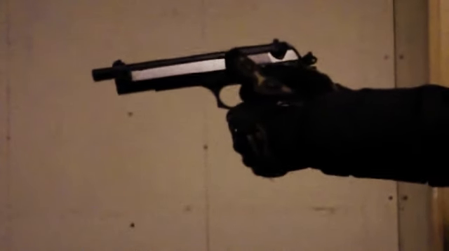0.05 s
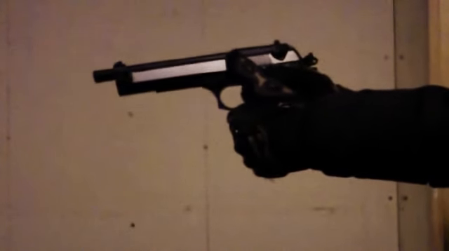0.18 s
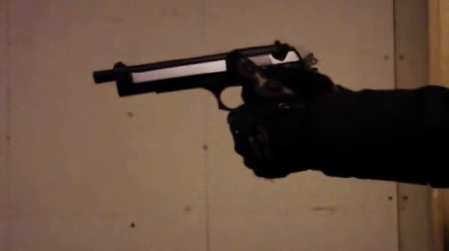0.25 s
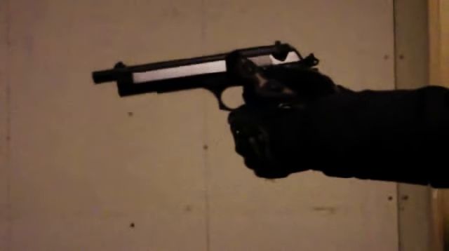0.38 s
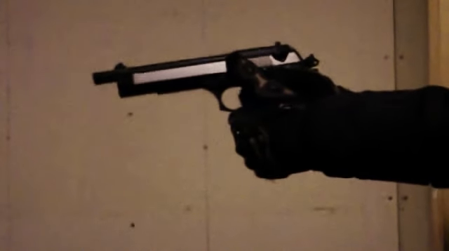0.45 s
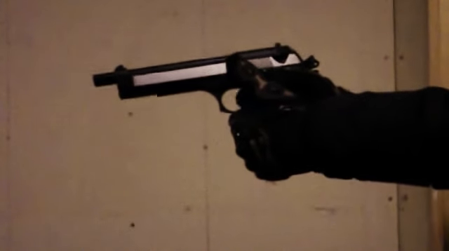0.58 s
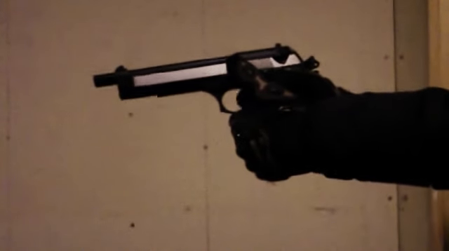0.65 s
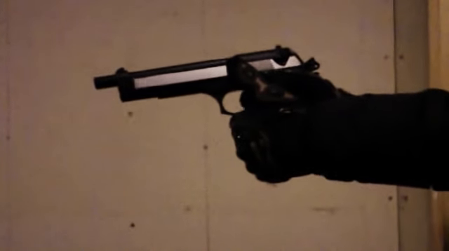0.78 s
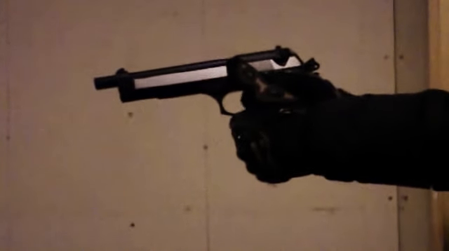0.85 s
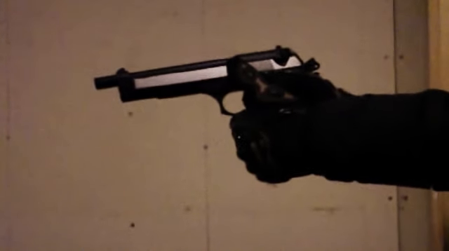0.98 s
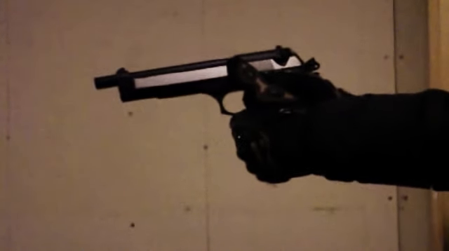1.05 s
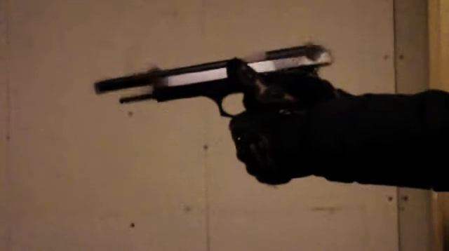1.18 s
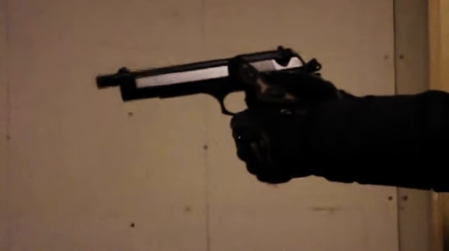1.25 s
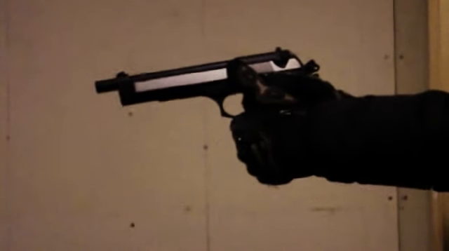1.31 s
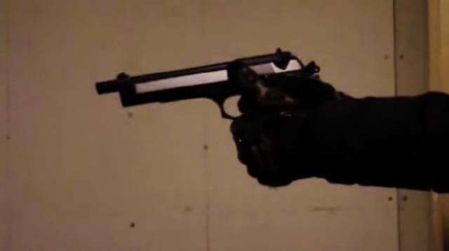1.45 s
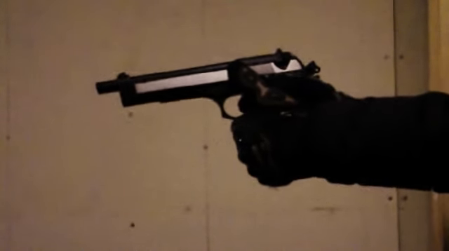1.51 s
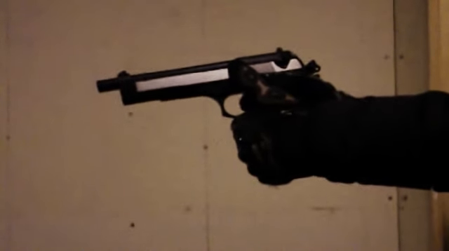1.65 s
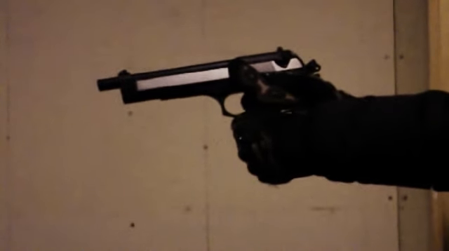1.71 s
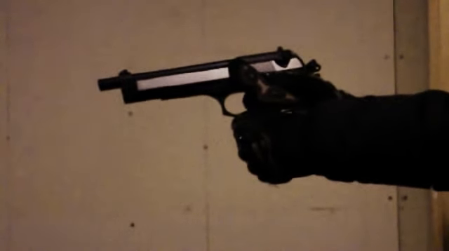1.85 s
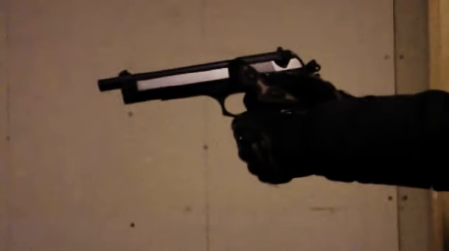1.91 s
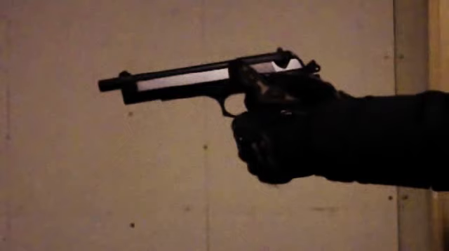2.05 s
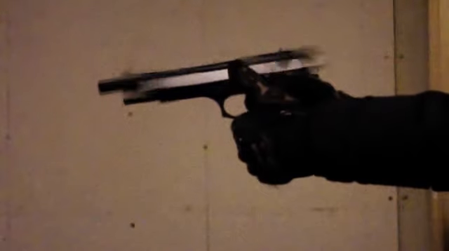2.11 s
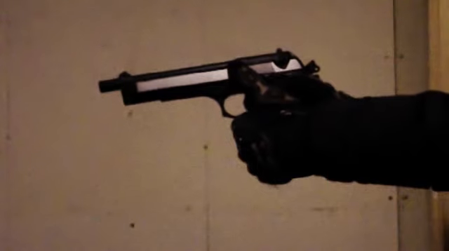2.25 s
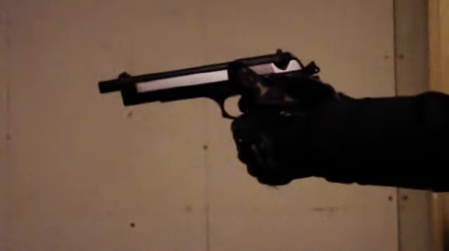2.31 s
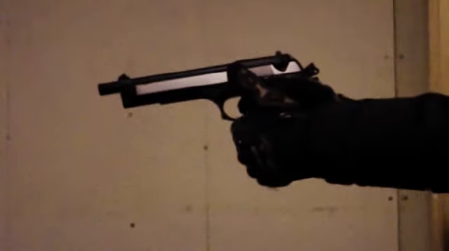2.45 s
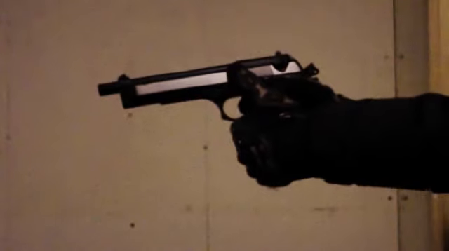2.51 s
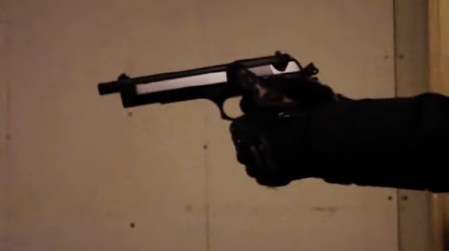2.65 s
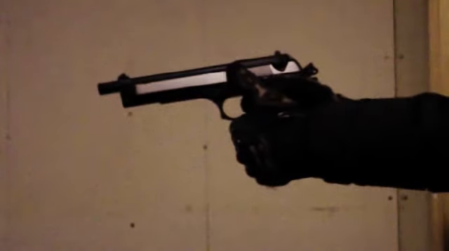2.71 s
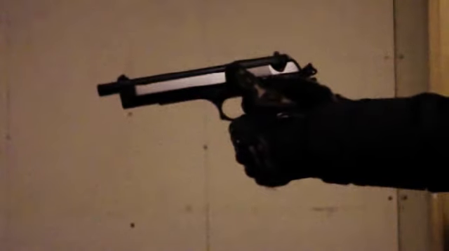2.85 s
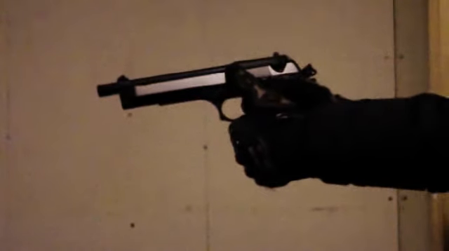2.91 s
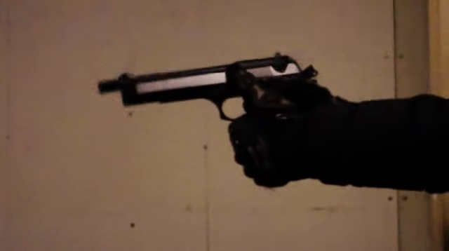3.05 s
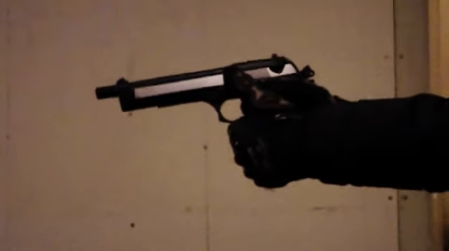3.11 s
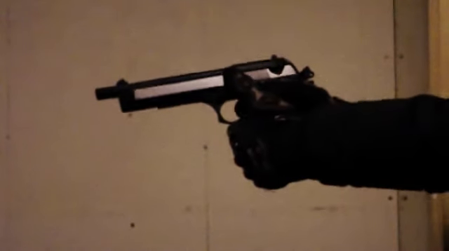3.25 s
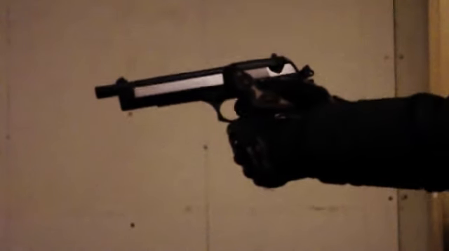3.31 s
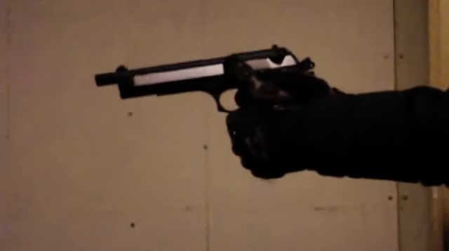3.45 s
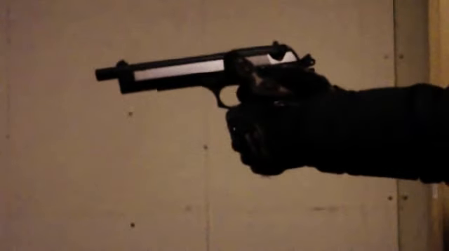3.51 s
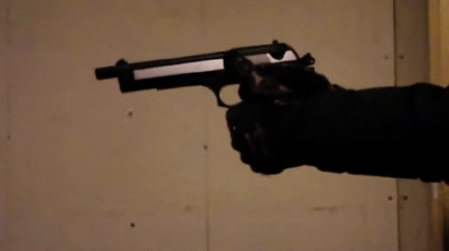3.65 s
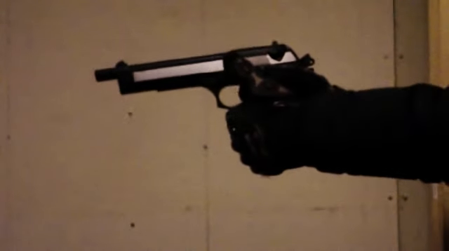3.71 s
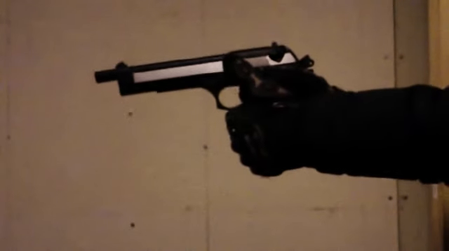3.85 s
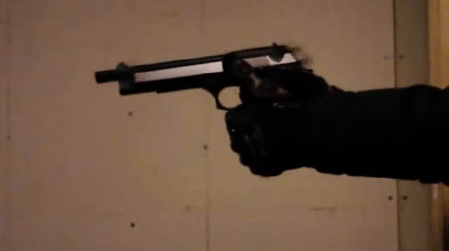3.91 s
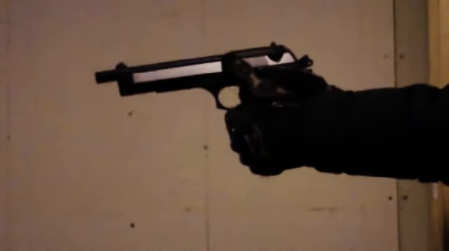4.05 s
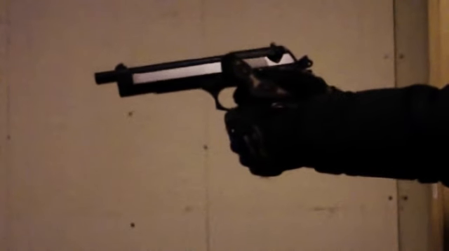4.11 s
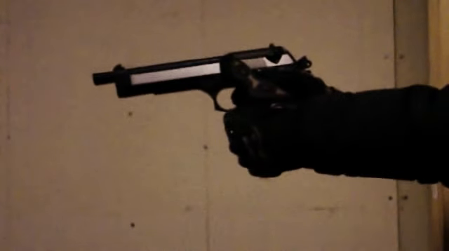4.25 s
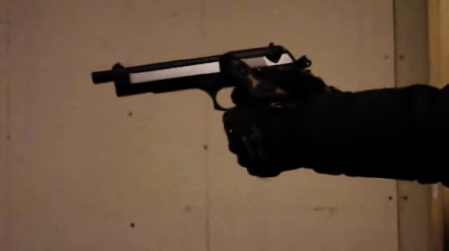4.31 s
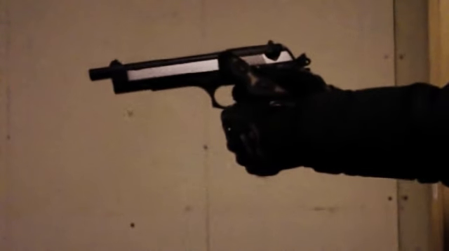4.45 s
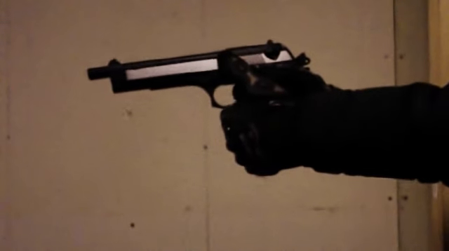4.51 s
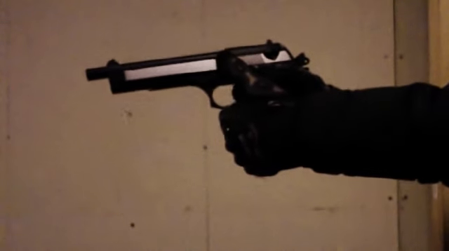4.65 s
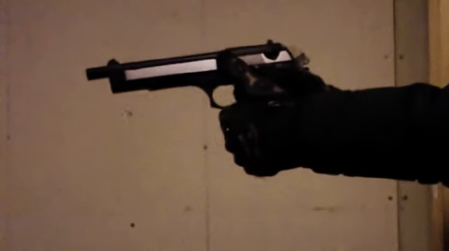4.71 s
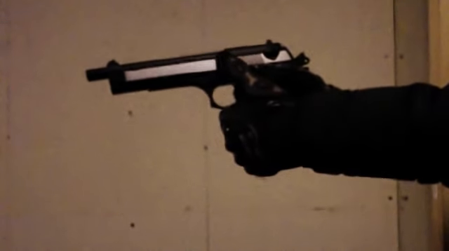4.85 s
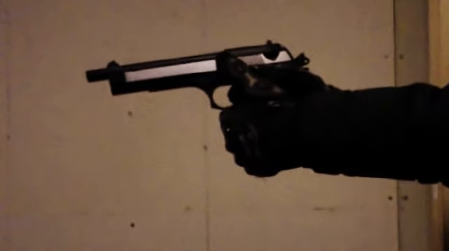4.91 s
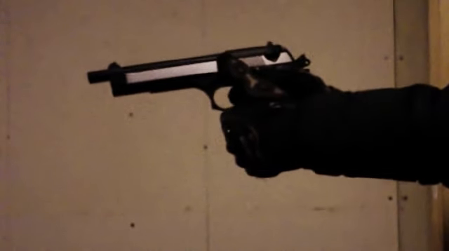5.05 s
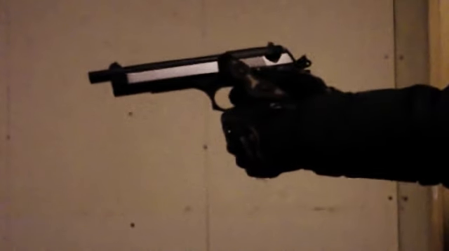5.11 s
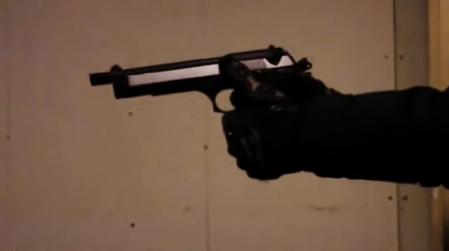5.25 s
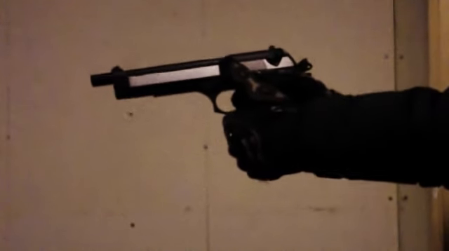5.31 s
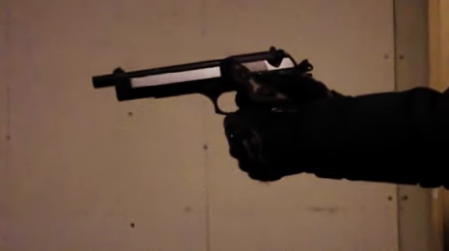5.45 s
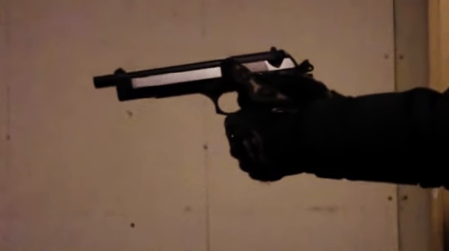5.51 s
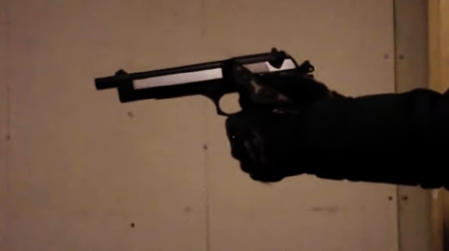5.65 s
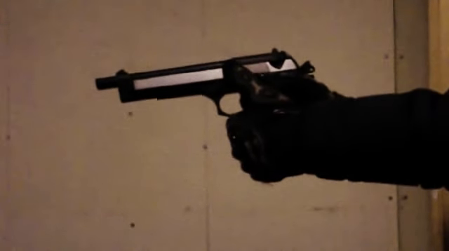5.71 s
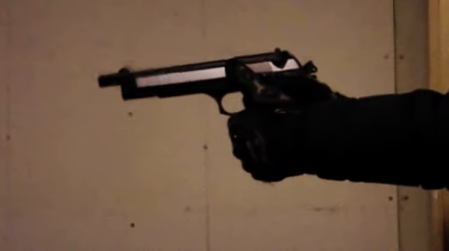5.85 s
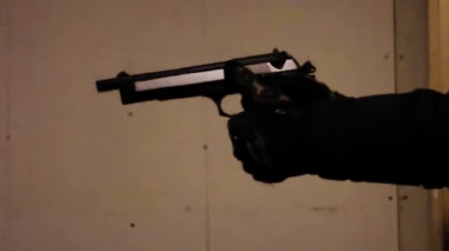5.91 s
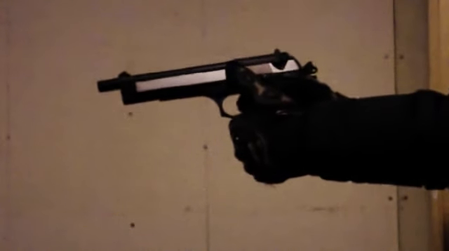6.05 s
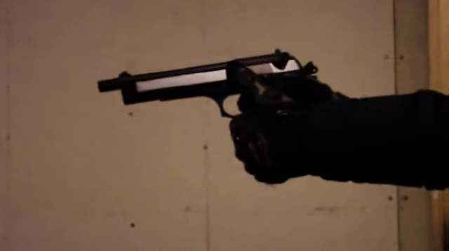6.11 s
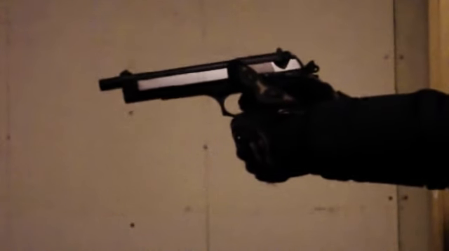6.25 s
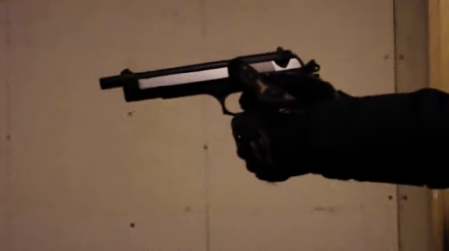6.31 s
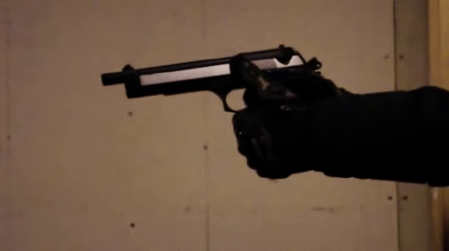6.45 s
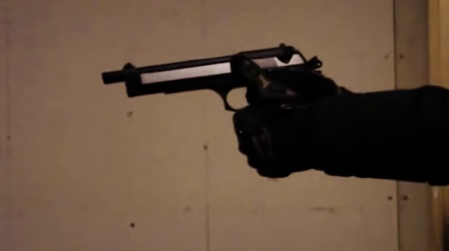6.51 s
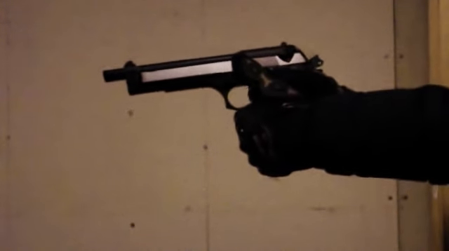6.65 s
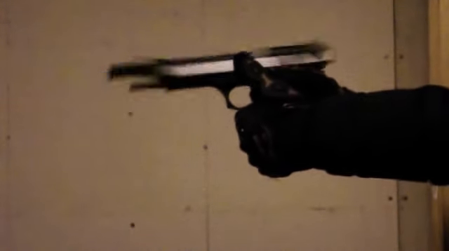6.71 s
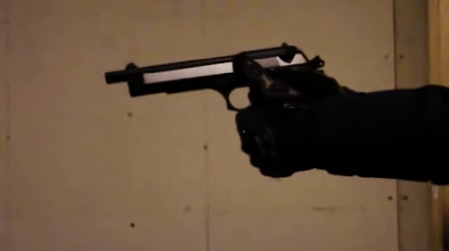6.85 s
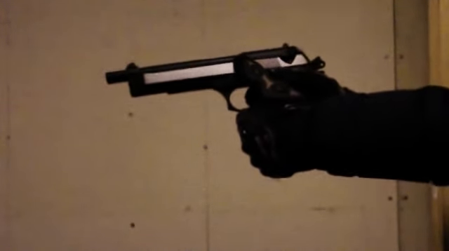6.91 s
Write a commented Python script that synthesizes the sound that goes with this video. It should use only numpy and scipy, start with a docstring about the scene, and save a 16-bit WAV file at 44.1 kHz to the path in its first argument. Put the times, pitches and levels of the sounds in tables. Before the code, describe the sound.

In a small room with hard walls, a close airsoft pistol cracks eight times at a steady pace. Every shot joins a hammer snap, a puff of gas and a slide clacking back and shut, then dies away quickly. A few faint ticks and soft handling sounds come in the gaps. Underneath are quiet room tone, a faint regular swish and a deep rumble that swells slightly with each shot.

```python
"""Eight sharp single shots from a gas blowback airsoft pistol, close to the microphone in a small hard room.
In each, the hammer cracks on the valve, the gas pops and hisses a moment later, and the slide hits
its rear stop, rebounds and slams shut. Pellet taps, light clicks and soft handling fall between shots.
The near walls answer with quick echoes and a short tail. Behind it all lie quiet room air,
a deep rumble that swells with each shot, and a faint repeating swish."""
import sys
import numpy as np
from scipy import signal
from scipy.fft import rfft, irfft, next_fast_len
from scipy.io import wavfile

SR = 44100
rng = np.random.default_rng(int(sys.argv[2]) if len(sys.argv) > 2 else 0)


def pcm_store(signal):
    """Save signal as 16-bit PCM."""
    levels = np.round(np.clip(np.atleast_2d(signal), -1, 1) * 32767)
    wavfile.write(sys.argv[1], SR, levels.astype(np.int16).T)


N = 307818
SIZE = 32768  # samples that hold one contact and its room tail
T = np.arange(SIZE) / SR
HZ = np.fft.rfftfreq(SIZE, 1 / SR)


def amp(db):
    """Decibels to gain."""
    return 10 ** (np.asarray(db) / 20)


def fade(t60):
    """A decay that loses 60 dB in t60 seconds."""
    return np.exp(-np.log(1000) * T / t60)


def along(points, hz):
    """Read a curve of (frequency, value) points on a log frequency axis."""
    freqs, values = np.transpose(points)
    return np.interp(np.log(hz + 1), np.log(freqs), values)


def add(track, start_s, sound):
    """Mix a sound into the track from start_s on."""
    start = max(round(start_s * SR), 0)
    part = sound[:max(N - start, 0)]
    track[start:start + len(part)] += part


def noise(spectrum):
    """Steady coloured noise of rms 1."""
    colour = amp(along(spectrum, np.fft.rfftfreq(N, 1 / SR)))
    steady = irfft(rfft(rng.standard_normal(N)) * colour, N)
    return steady / steady.std()


def burst(spectrum, t60, rise_s, knock_db=0):
    """A dying puff of coloured noise; knock_db lifts or cuts the bass below about 900 Hz."""
    colour = amp(along(spectrum, HZ))
    colour *= amp(knock_db / (1 + (HZ / 900) ** 4)) / np.sqrt(np.mean(colour ** 2))
    cepstrum = irfft(np.log(colour))  # folded to minimum phase: nothing rings before the blow
    cepstrum[1:SIZE // 2] *= 2
    cepstrum[SIZE // 2 + 1:] = 0
    puff = rng.standard_normal(SIZE) * fade(t60) * (1 - np.exp(-T / rise_s))
    puff *= np.sqrt(SR / 1000) / np.linalg.norm(puff)
    return irfft(rfft(puff) * np.exp(rfft(cepstrum)))


def ring(modes, rise_s):
    """Damped modes, struck at slightly new strengths each time."""
    tones = sum(amp(db + rng.normal()) * np.sin(2 * np.pi * hz * T) * fade(t60) for hz, db, t60 in modes)
    return tones * (1 - np.exp(-T / rise_s))


# The air of the quiet room: frequency_hz, level_db
AIR_SPECTRUM = [(30, 0), (60, -8), (130, -16), (400, -22), (600, -21), (1100, -27), (2000, -31),
                (3000, -36), (4200, -46), (6000, -42), (10500, -46), (12800, -57)]

def room_air():
    """Steady room tone, strongest in the bass."""
    return amp(-54.5) * noise(AIR_SPECTRUM)


def rumble():
    """Each shot stirs up a deep rumble, which holds a moment and sinks back to rest."""
    rest_db, swell_db = -56, -44
    attack_s, hold_s, fall_db_per_s = .012, .18, 22
    power = np.full(N, amp(rest_db) ** 2)
    for start_s, *_ in TRIGGER_PULLS:
        age = np.maximum(np.arange(N) / SR - start_s, 0)
        fall_db = fall_db_per_s * np.maximum(age - hold_s, 0)
        power += (np.minimum(age / attack_s, 1) * amp(swell_db - fall_db)) ** 2
    return np.sqrt(power) * noise([(8, -5), (22, -.5), (36, -4), (60, -16.5), (120, -43), (400, -68.5)])


# A swish in the background of the room: frequency_hz, level_db
SWISH_SPECTRUM = [(200, -13), (550, -10.5), (760, 2.5), (1000, -17.5), (1300, -11.5), (1520, -3.5),
                  (1700, -10), (1900, -7), (3100, -13.5), (4300, -17), (5500, -16.5), (13000, -27.5)]

def swish():
    """A short, faint swish comes round at a steady pace."""
    first_s, period_s, length_s, edge_s = .085, .6856, .125, .027
    age = (np.arange(N) / SR - first_s) % period_s
    envelope = np.clip(np.minimum(age, length_s - age) / edge_s, 0, 1)
    return amp(-61) * envelope * noise(SWISH_SPECTRUM)


# Echoes off the floor and the walls near the microphone: delay_s, relative_gain
WALL_ECHOES = [(.0033, .75), (.0108, .45), (.014, .48), (.0173, .36), (.0269, .3)]
# Reverberation of the small hard room: frequency_hz, t60_s
ROOM_DECAY = [(150, 0.26), (350, .28), (600, 0.3), (1000, 0.29), (2200, 0.33), (6000, 0.34), (12000, 0.33)]

def in_room(sound, walls, wet_db, build_s):
    """Direct sound, near-wall echoes that weaken in the treble, and a fresh diffuse tail."""
    hz, t, bands = signal.stft(rng.standard_normal(SIZE), SR, nperseg=256)
    decay = np.exp(-np.log(1000) * t / along(ROOM_DECAY, hz)[:, None])
    tail = signal.istft(bands * decay, SR, nperseg=256)[1][:SIZE]
    tail *= 1 - np.exp(-T / build_s)
    diffuse = amp(wet_db) * rfft(tail) / np.linalg.norm(tail)
    echoes = sum(gain * np.exp(-2j * np.pi * HZ * delay_s) for delay_s, gain in WALL_ECHOES)
    echoes /= np.sqrt(1 + (HZ / 2500) ** 2)
    heard = irfft(rfft(sound) * (1 + walls * echoes + diffuse))
    return heard * np.minimum(1, 10 * (T[-1] - T))  # fade out over the last 0.1 s


# The ring of slide and frame: pitch_hz, level_db, t60_s
FRAME_MODES = [(828, -3.5, 0.048), (1890, -7.5, 0.066), (2212, -4.5, 0.061), (2492, 0, 0.042),
               (2700, -11.5, 0.024), (5520, -8.5, 0.021), (5770, -11.5, 0.084), (10550, -11, .015)]

def blows(rows, spectrum, t60, rise_s, ring_db, walls, wet_db):
    """Contacts in the room, one a row: a burst of noise with its low knock, and ringing metal."""
    track = np.zeros(N)
    for start_s, level_db, knock_db in rows:
        hit = burst(spectrum, t60, rise_s, knock_db) + amp(ring_db) * ring(FRAME_MODES, rise_s=.0002)
        add(track, start_s, amp(level_db) * in_room(hit, walls, wet_db, build_s=.0041))
    return track


# The colour of light contacts: frequency_hz, level_db
TICK_SPECTRUM = [(40, -29.5), (150, -16), (400, -8), (640, -5.5), (1100, -10.5), (1600, -12), (2200, -5),
                 (3300, -11), (5700, -13.5), (7500, -24.5), (10400, -19.5), (12800, -24)]
# Small movements of the hand, close to the microphone: start_s, level_db, knock_db
HAND_SHIFTS = [(0.0024, -37, 5.5), (0.0895, -40.5, 6.5), (3.0135, -37, 8.5), (3.0383, -55, 27),
               (4.3326, -32.5, -9), (4.3716, -41, 5), (4.5985, -38.5, 3.5)]

def handling():
    """The glove and the trigger shift softly."""
    return blows(HAND_SHIFTS, TICK_SPECTRUM, t60=.19, rise_s=.0051, ring_db=-34, walls=.27, wet_db=-7)


# Pellet taps in the room and clicks of the action: start_s, relative_level_db, knock_db
LIGHT_TAPS = [(1.8612, -31.5, -4), (1.8717, -34.5, 8), (3.4547, -25, -1), (3.4627, -29.5, 0),
              (3.6699, -28.5, 3.5)]

def taps():
    """Pellets tap and the action clicks lightly between the shots."""
    ticks = blows(LIGHT_TAPS, TICK_SPECTRUM, t60=.053, rise_s=.0018, ring_db=-45, walls=.44, wet_db=-4)
    return amp(-1.5) * ticks


def swell_into_crack():
    """A faint, very short rush of noise swells into each shot's crack."""
    track = np.zeros(N)
    for start_s, hammer_db, *_ in TRIGGER_PULLS:
        tick = burst(TICK_SPECTRUM, t60=.013, rise_s=.0001, knock_db=-4)
        rush = tick[:SIZE // 20][::-1]  # reversed, so it swells
        add(track, start_s - len(rush) / SR, amp(hammer_db - 16) * rush)
    return track


# The clack of the slide at close range: frequency_hz, level_db
CLACK_SPECTRUM = [(40, -42.5), (110, -20), (240, -19), (340, -4), (450, -11.5), (580, -6), (1100, -15),
                  (1500, -18.5), (1950, -12), (2550, -15.5), (3300, -22.5), (5600, -22.5), (7000, -30.5),
                  (10400, -27.5), (12800, -35.5)]

def slide():
    """Blown back, the slide hits its rear stop, rebounds, and is sprung shut."""
    stop_s, rebound_s, close_s = .0395, .047, .066  # after the hammer
    hits = []  # start_s, relative_level_db, knock_db
    for start_s, *_, stop_db, close_db in TRIGGER_PULLS:
        hits += [(start_s + stop_s, stop_db, 0),
                 (start_s + rebound_s, stop_db - 2.5, 3),
                 (start_s + close_s, close_db, -5.5)]
    clacks = blows(hits, CLACK_SPECTRUM, t60=.071, rise_s=.001, ring_db=-24.5, walls=.14, wet_db=-2)
    return amp(-2) * clacks


# The hollow ring of the gas pop: pitch_hz, level_db, t60_s
POP_MODES = [(168, -13, 0.1), (319, -12.5, 0.028), (389.3, -18.5, 0.2), (486, -22.5, 0.18),
             (575, 3.5, 0.023), (773.3, -22, 0.019), (1150, -20.5, 0.023)]
# The gas jet at the muzzle: frequency_hz, level_db
JET_SPECTRUM = [(200, -9), (1000, -12), (1600, -11.5), (2300, -3.5), (3400, -9), (5600, -10), (7000, -23),
                (10400, -16), (12800, -16)]
# Thin whistles of the gas ports: pitch_hz, level_db, t60_s
PORT_MODES = [(7400, -18, 0.029), (7443, -15.5, 0.068), (8500, -23, 0.069), (8540, -22, 0.11)]

def gas():
    """Each release of gas gives a hollow pop, a short hiss and a whistle of the ports."""
    delay_s = .0108  # after the hammer
    track = np.zeros(N)
    low_cut = signal.butter(2, 150, "highpass", fs=SR, output="sos")  # the pop carries no deep bass
    for start_s, _, _, gas_db, hiss_db, *_ in TRIGGER_PULLS:
        pop = signal.sosfilt(low_cut, -amp(3.5) * ring(POP_MODES, rise_s=.00084))
        pop = in_room(pop, walls=1, wet_db=-12, build_s=.03)
        hiss = amp(hiss_db + 5.5) * burst(JET_SPECTRUM, t60=.037, rise_s=.00046)
        hiss = in_room(hiss, walls=.53, wet_db=-3.5, build_s=.011)
        whistle = in_room(ring(PORT_MODES, rise_s=.00053), walls=2, wet_db=-13, build_s=.006)
        add(track, start_s + delay_s, amp(gas_db) * (pop + hiss + whistle))
    return track


# The crack of the hammer at close range: frequency_hz, level_db
CRACK_SPECTRUM = [(40, -33.5), (110, -20.5), (200, -14), (330, -2.5), (450, -8.5), (580, 3.5), (750, -8),
                  (1400, -10.5), (2450, -8.5), (3300, -17), (5600, -17.5), (7000, -29.5), (10400, -21.5),
                  (12800, -33)]
# The eight shots beside the microphone, levels relative within each column:
# start_s, hammer_db, hammer_knock_db, gas_db, hiss_db, slide_stop_db, slide_close_db
TRIGGER_PULLS = [(0.4434, -8, 11.5, -9.5, -12.5, -9, -11), (1.335, -5.5, 2.5, -9.5, -16.5, -12, -16),
                 (2.2827, -5, -2, -8, -13.5, -8, -14.5), (3.1778, -6, 4.5, -8, -14.5, -17, -13),
                 (4.12, -5.5, 3.5, -8, -10.5, -11, -15), (4.9284, -7.5, 7, -7, -13, -6.5, -18.5),
                 (5.9621, -9, 4.5, -8.5, -12, -7, -16.5), (6.8634, -6.5, 4.5, -10.5, -17, -11.5, -10)]

def hammer():
    """The hammer lands on the valve and opens each shot with a crack."""
    hits = [pull[:3] for pull in TRIGGER_PULLS]
    cracks = blows(hits, CRACK_SPECTRUM, t60=.019, rise_s=.0016, ring_db=-11, walls=.14, wet_db=-1)
    return amp(-3.5) * cracks


def scene():
    """The pistol up close and the room around it, in mono."""
    foreground = hammer() + slide() + taps() + handling() + swell_into_crack() + gas()
    return (foreground + room_air() + rumble() + swish())[None]


def record(dry):
    """The microphone hears the treble twice, a quarter millisecond apart, which cuts even notches."""
    notch_spacing_hz, top_hz = 4020, 12950
    size = next_fast_len(N + SR)
    hz = np.fft.rfftfreq(size, 1 / SR)
    depth = along([(800, 0), (3000, .96), (8000, .71), (12000, .85)], hz)
    comb = 1 - depth * np.exp(-2j * np.pi * hz / notch_spacing_hz)
    high_cut = 1 / np.sqrt(1 + (hz / top_hz) ** 400)
    return irfft(rfft(dry, size) * comb * high_cut, size)[:, :N]


dry = scene()
out = record(dry)
pcm_store(out)
```